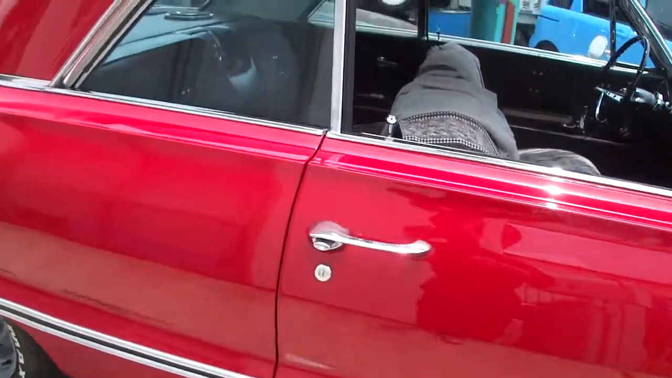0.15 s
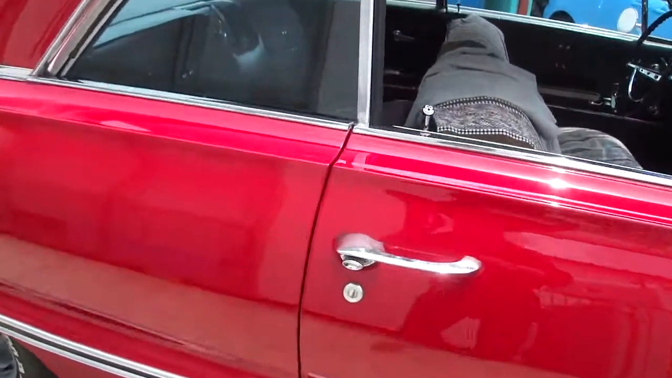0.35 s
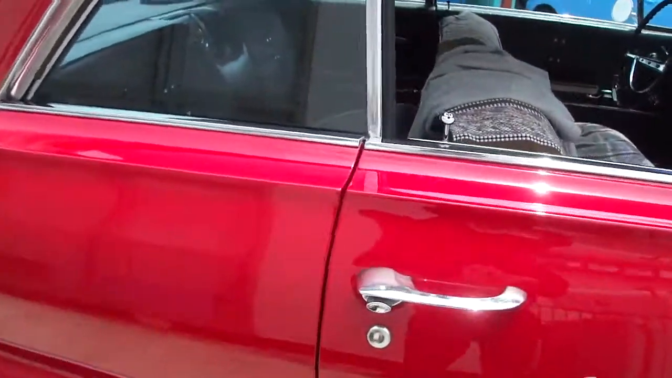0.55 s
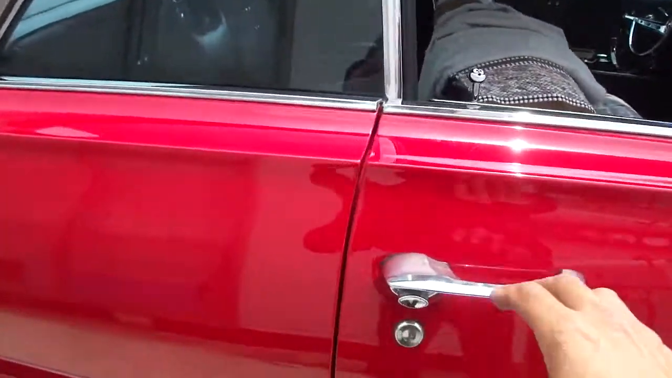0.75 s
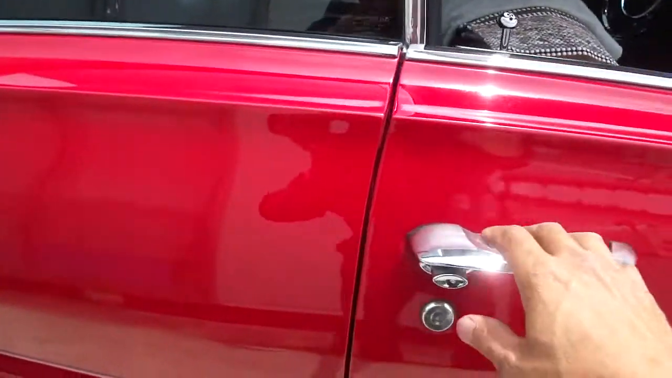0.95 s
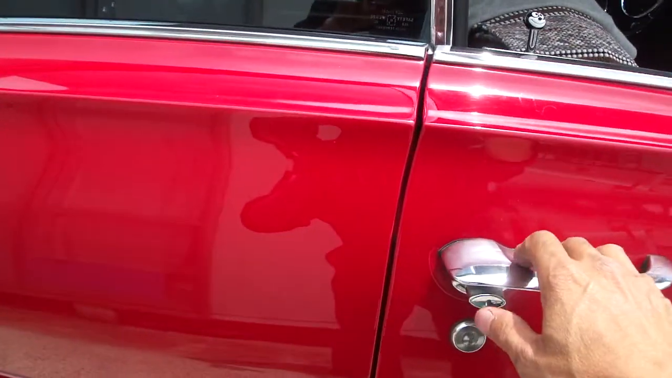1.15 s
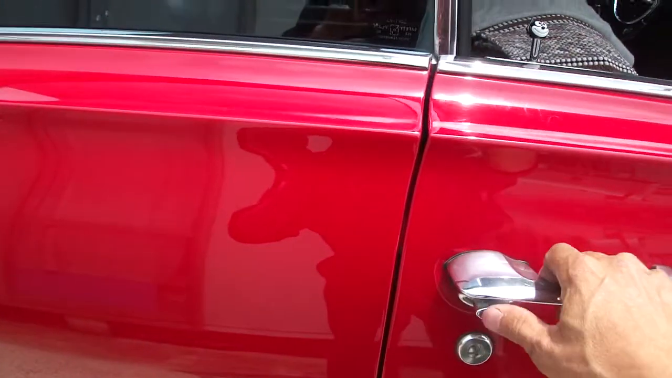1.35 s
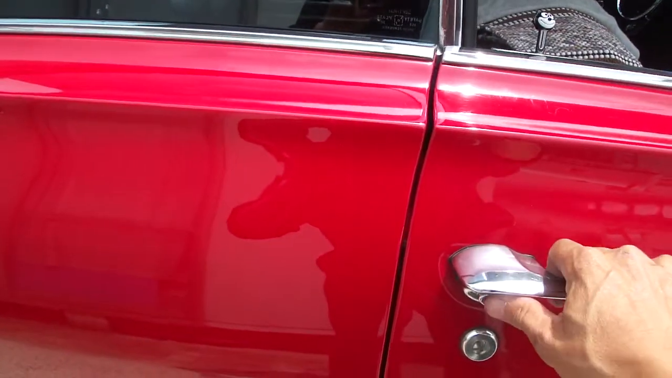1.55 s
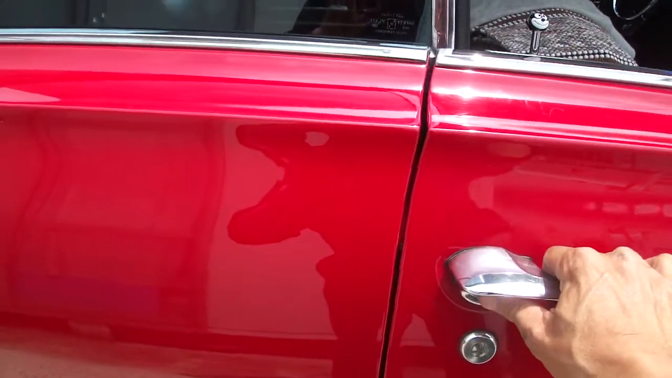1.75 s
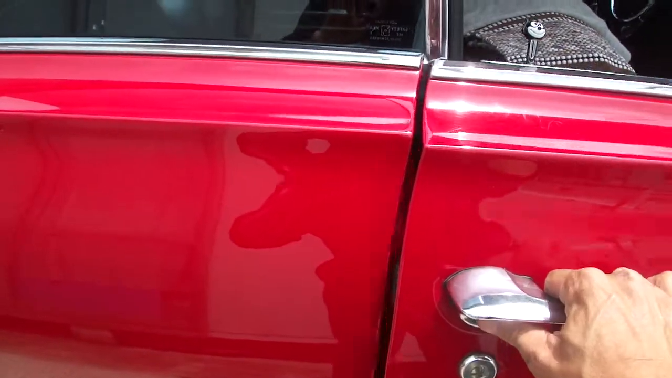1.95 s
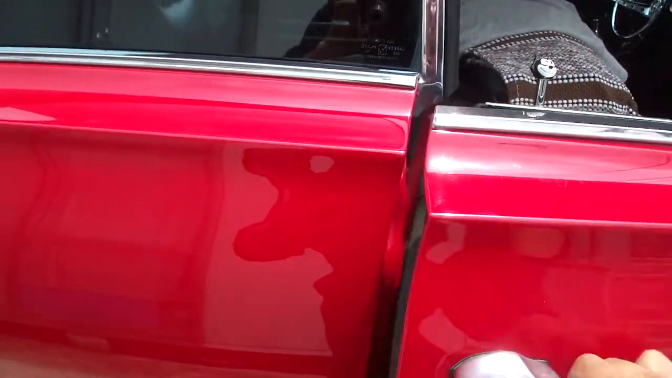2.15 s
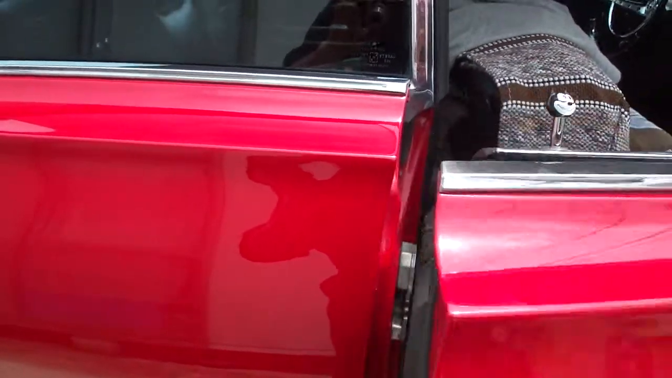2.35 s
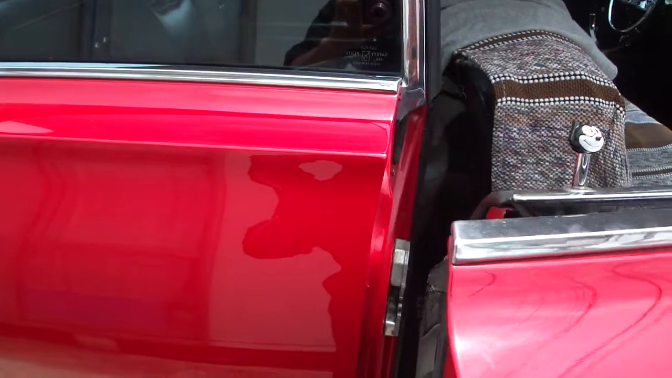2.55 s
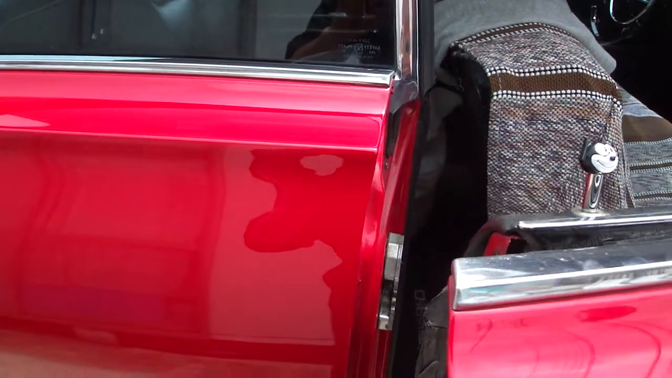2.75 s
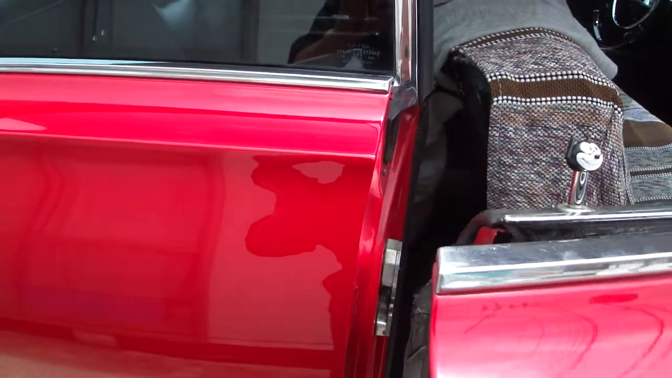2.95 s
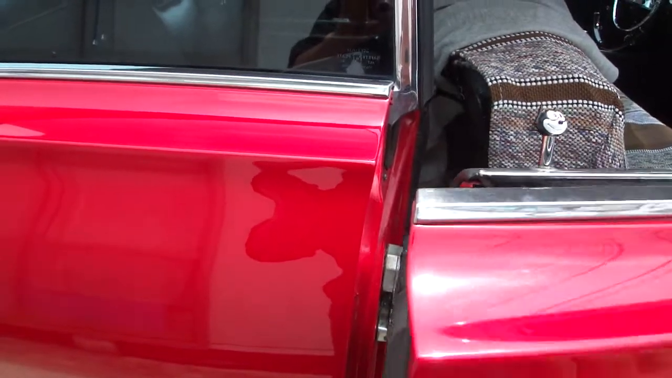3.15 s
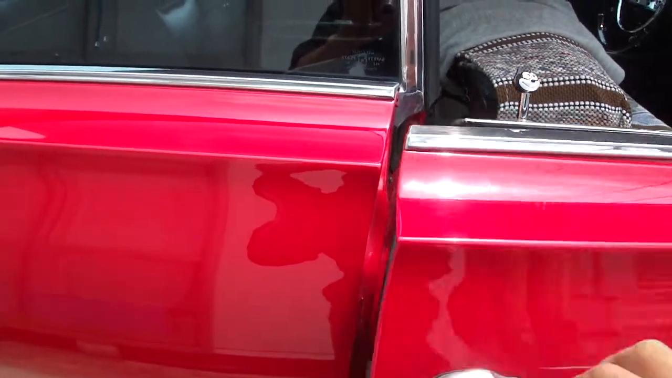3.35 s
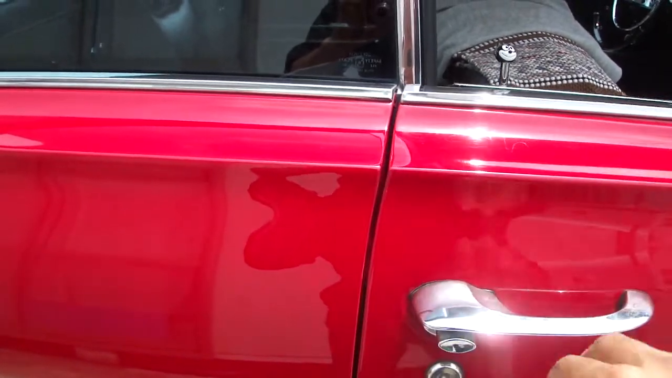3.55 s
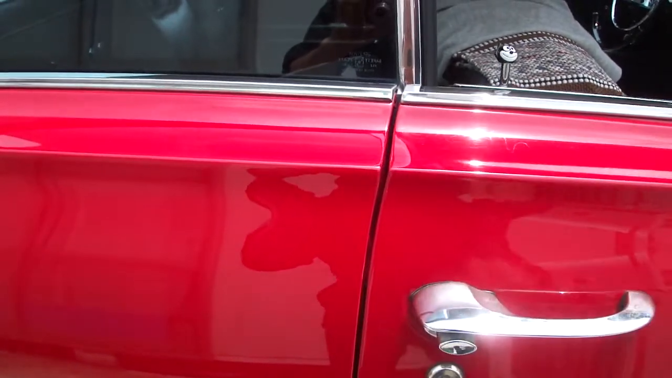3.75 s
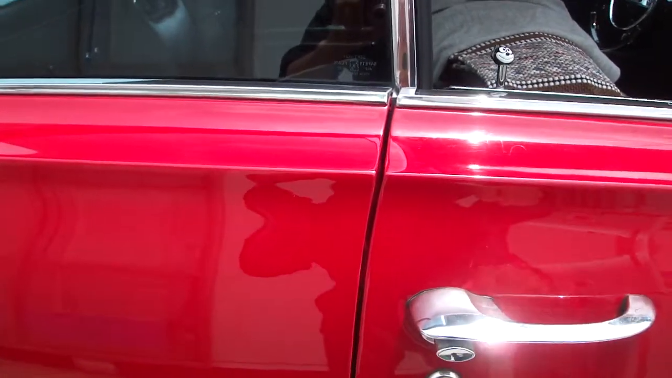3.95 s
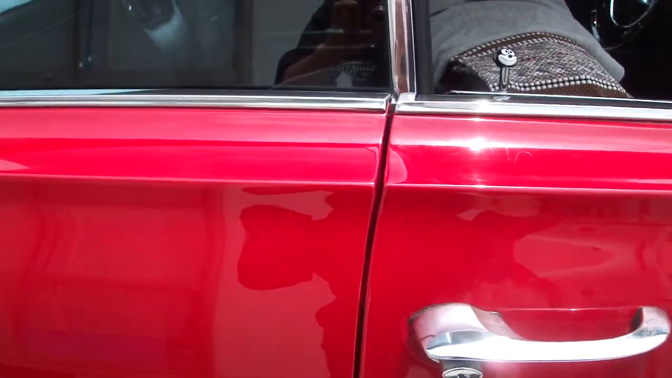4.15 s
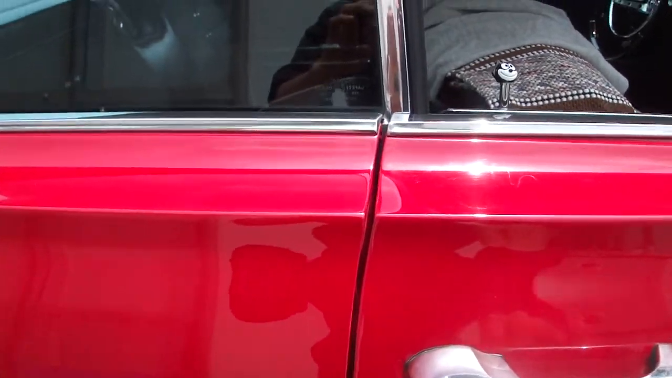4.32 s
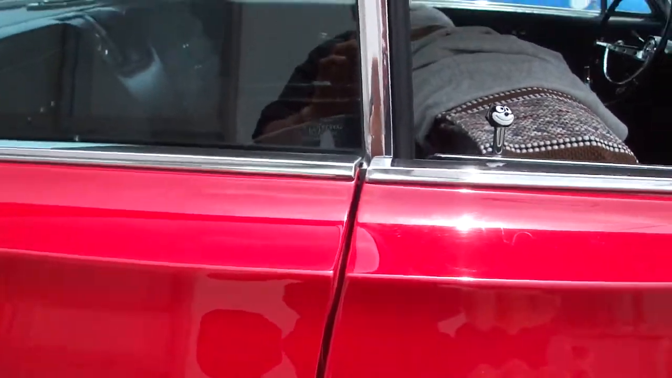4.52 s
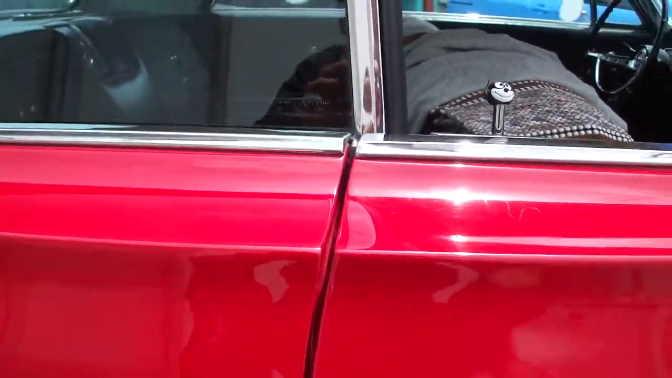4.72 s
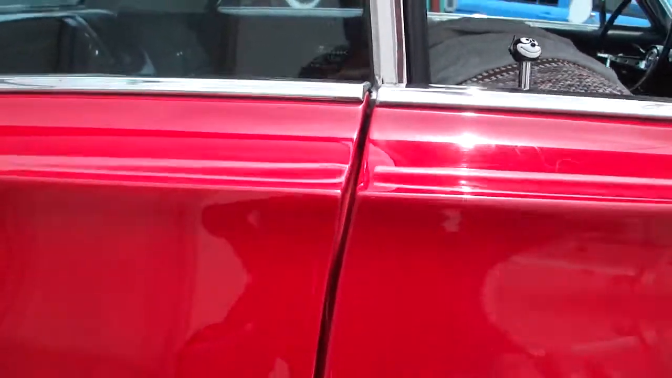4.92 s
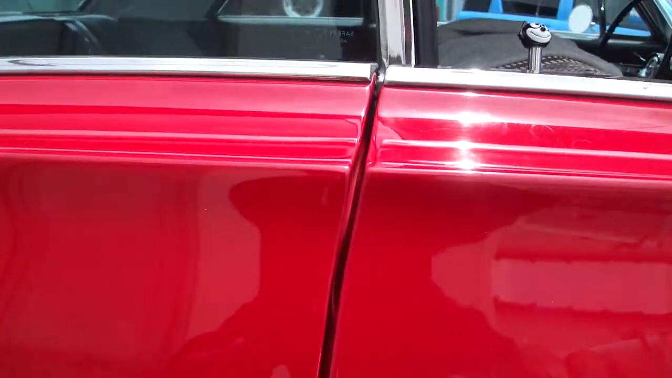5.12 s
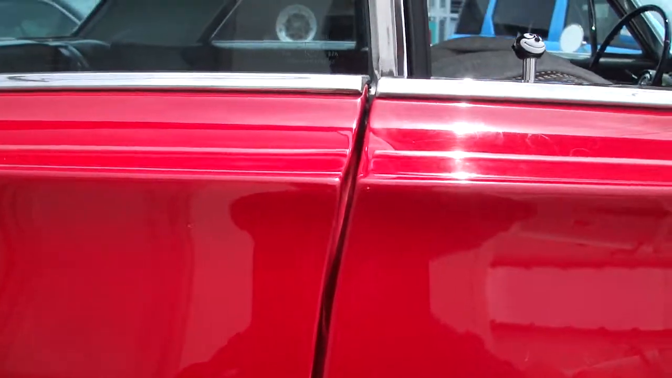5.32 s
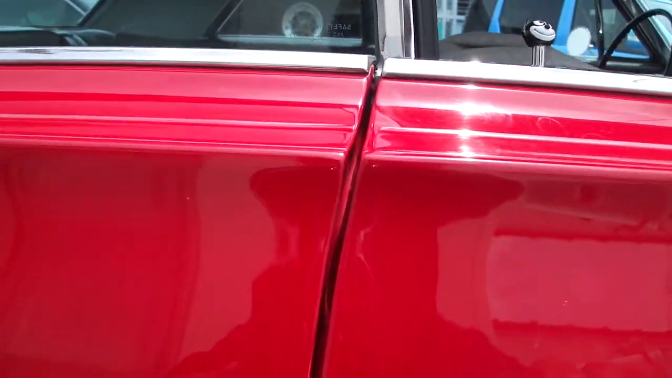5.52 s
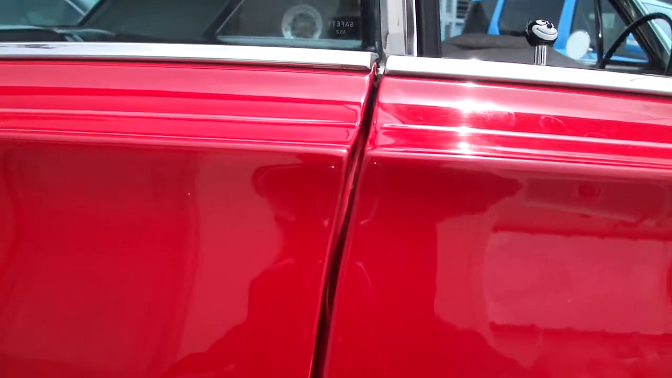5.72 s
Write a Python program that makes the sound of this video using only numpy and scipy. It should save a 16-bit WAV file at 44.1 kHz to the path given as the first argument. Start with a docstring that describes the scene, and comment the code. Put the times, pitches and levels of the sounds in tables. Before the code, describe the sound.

A heavy old car door is unlatched with clicks and a creak, springs open with a clank, then slams shut with a rattling steel thud outdoors.

```python
"""Outdoors in a yard, at the heavy door of an old car, an arm's length from a hand-held camera.
A thumb works the handle button, the latch creaks and springs open; then the door is slammed.
Damped sine knocks, noise rattles and ringing steel modes make the latch, loose parts and thuds into the seal.
The shut steel ticks as it settles. Shaped noise makes a steady drone and a brief scuff; a wavering sine
makes a low hum, and faint filtered clicks make the camera's lens tick at its frame rate."""
import sys
import numpy as np
from scipy import signal
from scipy.fft import rfft, irfft
from scipy.io import wavfile
from scipy.ndimage import uniform_filter1d

SR = 44100
rng = np.random.default_rng(int(sys.argv[2]) if len(sys.argv) > 2 else 0)


def unload_audio(sound):
    """Save the sound as a 16-bit wav file, at the path given as the first command line argument."""
    columns = np.transpose(np.atleast_2d(sound))
    # keep every value between -1 and 1, then stretch to whole-number steps
    steps = np.round(np.clip(columns, -1, 1) * 32767)
    wavfile.write(sys.argv[1], SR, steps.astype(np.int16))


N = 254898
HZ = np.fft.rfftfreq(N, 1 / SR)
TIME = np.arange(N) / SR

# tone colour of rattling steel parts: f/Hz, relative level/dB
STEEL_COLOUR = [(100, -11), (350, -10), (650, 6.5), (1400, 0.5), (1850, -5.5), (2300, -2.5), (3000, -12.5),
                (5200, -18), (6200, -26), (7800, -32), (8600, -43.5), (14000, -56)]
# how the door reaches the two microphone ports: f/Hz, likeness/0-1, right lead/rad, left minus right/dB
DOOR_PORTS = [(103, 0.88, 0.13, 0.5), (700, 0.98, 0.00052, 2), (1350, 0.95, 0.75, -0.5),
              (2300, 0.63, 0.3, -5), (4300, 0.7, 0.7, -6.5), (7740, 0.47, 0.48, -4.5)]


def amp(db):
    """Turns decibels into a gain."""
    return 10 ** (np.asarray(db) / 20)


def evened(x):
    """Scales a signal to an rms of 1."""
    return x / np.sqrt(np.mean(x ** 2) + 1e-20)


def read(points, hz, order=1):
    """Reads one column of a table, joining its points by lines on a log-frequency axis."""
    columns = np.transpose(points)
    return np.interp(np.log(hz + 1), np.log(columns[0] + 1), columns[order])


def add(mix, s, sound):
    """Mixes a sound in, starting at s seconds."""
    part = mix[..., round(s * SR):][..., :sound.shape[-1]]
    part += sound[..., :part.shape[-1]]


def colour(x, spectrum, size=4096):
    """Gives a sound the tone colour of a table; the filter has unit energy and never acts early."""
    log_gain = np.log(amp(read(spectrum, abs(np.fft.fftfreq(size, 1 / SR)))))
    minimum_phase = np.exp(signal.hilbert(log_gain).conj())
    taps = np.fft.ifft(minimum_phase).real[:size // 2]
    taps = taps / np.linalg.norm(taps)
    return signal.oaconvolve(x, taps[None], axes=1)[:, :N]


def related(x, likeness):
    """Blends two unrelated channels so that they become alike, frequency by frequency."""
    a, b = rfft(x, N)
    angle = np.arccos(np.clip(read(likeness, HZ), 0, 1)) / 2
    shared, unlike = a * np.cos(angle), b * np.sin(angle)
    return irfft([shared + unlike, shared - unlike], N)


def ports(x, table):
    """Sets the balance and phase between the two microphone ports, half on each side."""
    balance = np.sqrt(amp(read(table, HZ, order=3)))
    half = balance * np.exp(-.5j * read(table, HZ, order=2))
    return irfft(rfft(x) * [half, 1 / half], N)


def outdoors(patchy_db=2.5, low_hz=250, hiss_hz=1800, size=2048):
    """Shaped noise makes a broad drone with fixed resonances; its lows and hiss drift against its body."""
    # tone colour of the drone: f/Hz, relative level per Hz/dB
    air_colour = [(20, -52), (45, -17), (70, -9.5), (130, 1.5), (230, 1), (320, -3.5), (520, -2), (680, 3),
                  (1480, -1.5), (1780, -8.5), (4800, -16.5), (8000, -32), (9300, -37), (11800, -40),
                  (14000, -61)]
    # resonances in the drone: f/Hz, width/Hz, height/dB
    air_peaks = [(403, 11.8, 11.9), (1415, 346, 14.23), (2468, 147, 10.6), (3920, 360, 7.9),
                 (4775, 150, 9.5)]
    # the resonances flatten as the camera is lifted: t/s, strength
    peak_strength = [(4.4, 1), (5.4, 0.18)]
    # level of the drone's body: t/s, level/dB
    body_level = [(0, -33.5), (1.2, -36.5), (1.9, -36.5), (2.5, -39), (3.15, -38.5), (3.35, -34.5),
                  (4.1, -39.5), (5.05, -41.5), (5.78, -39)]
    # level of its rumble, the band round low_hz: t/s, level/dB
    rumble_level = [(0, -35.5), (.5, -35), (.9, -39), (1.9, -37), (2.6, -40), (4.4, -40), (4.8, -35),
                    (5.78, -39)]
    # how the drone reaches the two microphone ports: f/Hz, likeness/0-1, right lead/rad, left minus right/dB
    air_ports = [(90, 1, 0.5, 2), (456, 0.7, 0.5, 1.5), (810, 0.92, 1.35, -1), (1180, 0.97, 1.52, 3.5),
                 (1635, 0.92, 3, 3), (2136, 0.63, 4, -11), (2510, 0.89, 2, -4), (3040, 0.45, 1.5, -3),
                 (3820, 0.54, 3.5, 1.5), (4560, 0.32, -0.2, 0.5), (7000, 0.25, 1, -2)]
    mean_hiss_db, hiss_follows = -39, 0.41  # the hiss follows only this share of the body's changes

    noise = rng.standard_normal((2, N))
    hz, t, z = signal.stft(noise, SR, nperseg=size, noverlap=size * 3 // 4)
    peaks_db = sum(db / (1 + (2 * (hz - f) / width) ** 2) for f, width, db in air_peaks)
    shape_db = read(air_colour, hz) + peaks_db

    body_db = np.interp(t, *np.transpose(body_level))
    rumble_db = np.interp(t, *np.transpose(rumble_level))
    hiss_db = mean_hiss_db + hiss_follows * (body_db - body_db.mean())
    low = np.exp(-np.log((hz + 1) / low_hz) ** 2)
    high = 1 - 1 / (1 + (hz / hiss_hz) ** 8)

    # small random patches in frequency and time
    patches = uniform_filter1d(rng.standard_normal(z.shape[1:]), size=16, axis=0)
    patches = evened(uniform_filter1d(patches, size=8, axis=1))
    drift_db = body_db + patchy_db * patches
    drift_db = drift_db + np.outer(low, rumble_db - body_db)
    drift_db = drift_db + np.outer(high, hiss_db - body_db)
    drift_db = drift_db + np.outer(peaks_db, np.interp(t, *np.transpose(peak_strength)) - 1)
    z = z * evened(amp(shape_db))[:, None] * amp(drift_db)
    air = signal.istft(z, SR, nperseg=size, noverlap=size * 3 // 4)[1][:, :N]
    return ports(related(air, air_ports), air_ports)


def hum(waver_db=-2.0, wander_hz=3, size=3000):
    """A low sine, as of a distant machine, whose pitch and level waver at random."""
    # course of the hum, before it wavers: t/s, f/Hz, level/dB
    hum_course = [(.35, 238.1, -53), (1.401, 226, -58), (2.5, 224.5, -59.5), (4.6, 231, -77),
                  (5.5, 232.2, -54.5)]
    s, hz, db = np.transpose(hum_course)
    smooth = uniform_filter1d(uniform_filter1d(rng.standard_normal((2, N)), size=size), size=size)
    waver, wander = evened(smooth[0]), evened(smooth[1])
    turns = np.cumsum(np.interp(TIME, s, hz) + wander_hz * wander) / SR
    level = amp(np.interp(TIME, s, db) + waver_db * waver)
    return level * evened(np.sin(2 * np.pi * turns))


def scuff(grain_db=3, clump_db=2.5, size=180):
    """A brief gritty rub: noise whose loudness jumps grain by grain and catches in clumps."""
    # loudness of the rub, silent outside: t/s, level/dB
    scuff_level = [(5.32, -62), (5.338, -44), (5.383, -43), (5.394, -56)]
    # its tone colour: f/Hz, relative level/dB
    scuff_colour = [(300, -30), (950, -18), (1300, 7.5), (1550, -3), (1900, -3), (2700, -16), (3250, -16),
                    (3620, -4.5), (4100, -20), (7000, -15), (13000, -47)]
    clumps = evened(uniform_filter1d(rng.standard_normal(N), size=size))
    grain_gain = amp(grain_db * rng.standard_normal(N) + clump_db * clumps)
    grit = evened(rng.standard_normal((2, N)) * grain_gain)
    level = amp(np.interp(TIME, *np.transpose(scuff_level), left=-np.inf, right=-np.inf))
    return related(colour(grit * level, scuff_colour), DOOR_PORTS)


def lens(fade=0.0017, click_db=12, scatter_db=2, left_db=-2.5, right_db=2):
    """The lens drive steps once a frame with a click and a short chatter; every second step is stronger."""
    # level of the ticks, before the alternation, scatter and balance: t/s, level/dB
    tick_level = [(0, -49.5), (1.3, -52.5), (3.2, -55.5), (4, -50.5), (5.3, -52), (5.52, -44),
                  (5.78, -48.5)]
    # tone colour of a tick: f/Hz, relative level/dB
    tick_colour = [(2000, -31), (4500, 1.5), (5900, 7.5), (6500, 5.5), (7100, 1), (7800, 6.5), (8600, -7.5),
                   (12000, -30)]
    first_s, frame_hz = .0152, 59.94
    uneven_db = 1.3  # even steps this much weaker, odd ones this much stronger
    times = np.arange(first_s, TIME[-1], 1 / frame_hz)
    k = np.arange(len(times))
    step_db = np.interp(times, *np.transpose(tick_level)) - uneven_db * np.cos(np.pi * k)
    step_db = step_db + scatter_db * rng.standard_normal(len(k))
    steps = np.zeros((2, N))
    for at, db in zip(times, step_db):
        add(steps, at, amp(db) * rattle(fade))
        add(steps, at, amp([db + click_db]))  # a single-sample click
    return colour(steps, tick_colour) * amp([[left_db], [right_db]])


def yard(x, wet_db=-16.5, build=0.005, size=256):
    """Scattered echoes from the ground and walls: noise that builds up, then dies at its own speed per band."""
    # time for the echoes to fall by 60 dB: f/Hz, decay/s
    yard_decay = [(100, 1), (250, 0.4), (700, 0.52), (2200, 0.29), (12000, 0.13)]
    hz, t, z = signal.stft(rng.standard_normal((2, SR)), SR, nperseg=size)
    z = z * amp(-60 * t / read(yard_decay, hz)[:, None]) * (1 - np.exp(-t / build))
    tail = signal.istft(z, SR, nperseg=size)[1]
    tail = tail / np.linalg.norm(tail[0])
    wet = signal.fftconvolve(x.mean(0)[None], tail, axes=1)[:, :N]
    return amp(wet_db) * related(wet, DOOR_PORTS)


def knock(hz, swell, order=1):
    """A few cycles of a heavily damped part, peaking after swell seconds."""
    t = TIME[:int(10 * swell * SR)]
    envelope = (t / swell * np.exp(1 - t / swell)) ** order
    return envelope * np.sin(2 * np.pi * hz * t)


def rattle(fade):
    """A swarm of tiny contacts dying over fade seconds, in two unrelated channels."""
    t = TIME[:SR // 2]
    return rng.choice([-1, 1], (2, len(t))) * np.exp(-t / fade)


def ringing(modes):
    """Modes (f/Hz, level/dB, 60 dB decay/s) struck with chance phases, in two unrelated channels."""
    t = TIME[:SR // 4]
    return sum(amp(db - 60 * t / t60) * np.sin(2 * np.pi * (hz * t + rng.random((2, 1))))
               for hz, db, t60 in modes)


def shell(blows):
    """The sheet steel of the door rings in its own modes after each blow."""
    # modes of the sheet steel: f/Hz, relative level/dB, 60 dB decay/s
    shell_modes = [(221, -3, .56), (339, 2, .22), (463, 0, .42), (592, 0, .36), (682, 2, .24),
                   (743, -1.5, .24), (784, -1, .2), (815, 1, .24), (904, 2, .22), (938, 2, .22),
                   (1020, -2, .2), (1168, 0, .24), (1363, 0, .22), (1497, 1, .18), (2122, -6, .26),
                   (2244, -2, .2), (2326, -5, .16), (2536, -10, .13)]
    shell_db = -45
    t = TIME[:SR]
    modes = sum(amp(db - 60 * t / t60) * np.sin(2 * np.pi * hz * t) for hz, db, t60 in shell_modes)
    return amp(shell_db) * signal.oaconvolve(blows, modes[None], axes=1)[:, :N]


def steel(shaken, treble, treble_hz=2800):
    """Rattles take the colour of steel; harder contact is given more treble."""
    dull = signal.lfilter(*signal.butter(1, treble_hz, fs=SR), shaken)
    return colour(dull + treble * (shaken - dull), STEEL_COLOUR)


def radiated(x, corner_hz):
    """A part that is small against the wavelength gives off little bass."""
    return signal.sosfilt(signal.butter(2, corner_hz, "highpass", fs=SR, output="sos"), x)


def settling(cycles=4.04, snap_fade=0.0068, squeak_db=-39, squeak_hz=1318):
    """The shut door ticks: a dry snap, a few cycles of steel and a thin squeak until about the next tick."""
    # ticks of the settling steel: t/s, knock level/dB, knock f/Hz, snap level/dB
    settle_ticks = [(4.641, -19.5, 1328, -31), (4.6838, -38, 2240, -41)]
    knocks, snaps = np.zeros(N), np.zeros((2, N))
    first_s = settle_ticks[0][0]
    t = np.arange(0, settle_ticks[1][0] - first_s, 1 / SR)
    slip = np.sin(np.pi * np.arange(len(t)) / len(t)) ** (1 / 4)
    squeak = amp(squeak_db) * slip * np.sin(2 * np.pi * squeak_hz * t)
    add(knocks, first_s + cycles / squeak_hz, squeak)
    for s, db, hz, snap_db in settle_ticks:
        add(knocks, s, amp(db) * knock(hz, cycles / hz, order=3))
        add(snaps, s, amp(snap_db) * rattle(snap_fade))
    return knocks + related(colour(snaps, STEEL_COLOUR), DOOR_PORTS)


def linkage(fade=0.017, dull_hz=3300, creak_swell=0.0028, creak_rattle_db=-17):
    """Each clunk or creaking slip knocks and shakes the loose parts inside the closed door."""
    # clunks of the button and its rod: t/s, knock level/dB, knock f/Hz, swell/s, rattle level/dB
    clunks = [(1.4972, -28, 780, 0.0016, -30), (1.5345, -22, 940, 0.0009, -34),
              (1.5395, -23, 750, 0.0032, -33), (1.5435, -26, 1020, .0015, -36),
              (1.719, -30, 902, 0.0055, -35), (1.739, -35, 485, 0.0061, -39),
              (1.8895, -30, 1000, 0.0089, -36), (1.9163, -17, 1220, 0.0016, -27),
              (1.9221, -12.5, 1080, .0018, -24)]
    # slips of the latch creaking under load, near one pitch: t/s, level/dB, f/Hz
    creaks = [(1.973, -25, 1250), (1.9987, -15, 1155), (2.0186, -23, 1180), (2.0322, -15, 1140),
              (2.045, -20.5, 1160)]
    rebound_s, rebound_db = 0.0083, -7.5  # each slip rebounds once
    knocks, shaken = np.zeros(N), np.zeros((2, N))
    for s, db, hz, swell, loose_db in clunks:
        add(knocks, s, amp(db) * knock(hz, swell))
        add(shaken, s, amp(loose_db) * rattle(fade))
    for s, db, hz in creaks:
        slip = amp(db) * knock(hz, creak_swell, order=3)
        add(knocks, s, slip)
        add(knocks, s + rebound_s, amp(rebound_db) * slip)
        add(shaken, s, amp(db + creak_rattle_db) * rattle(fade))
    muffled = signal.lfilter(*signal.butter(2, dull_hz, fs=SR), shaken)
    return knocks + related(colour(muffled, STEEL_COLOUR), DOOR_PORTS)


def catch(ring_db=-21, t60=0.1, swell=.001):
    """Freed from the striker as the door springs open, the catch flies against its stop and rings."""
    # modes of the latch's catch: f/Hz, relative level/dB
    catch_modes = [(1026, -4), (1110, -5), (1392, -5), (1495, 0), (1646, -2), (2020, -7), (3149, -15),
                   (3542, -14)]
    release_s = 2.141
    out = np.zeros((2, N))
    rise = (1 - np.exp(-TIME[:SR // 4] / swell)) ** 2
    ring = ringing([(hz, db, t60) for hz, db in catch_modes])[0]  # the same in both channels
    add(out, release_s, amp(ring_db) * rise * ring)
    return out


def loose_parts(contact=0.005, hard_db=10.5, soft_db=-1):
    """Rods, springs and window gear chatter at random while the door shakes, duller as they die down."""
    # shaking as the door springs open, meets the striker and lands in its seal:
    # t/s, hold/s, fade/s, chatter level/dB, shell blow level/dB
    shakes = [(2.132, 0.016, 0.017, -24, -45), (3.52, 0.07, 0.06, -28.5, -38),
              (3.605, 0.025, 0.045, -36, -31)]
    contacts_per_s, contact_spread_db = 260, 2.5
    sizes = amp(contact_spread_db * rng.standard_normal(N)) * (rng.random(N) < contacts_per_s / SR)
    # every contact is a burst of noise that fades over contact seconds
    power = signal.lfilter([1], [1, -np.exp(-2 / (contact * SR))], sizes ** 2)
    chatter = evened(np.sqrt(power) * rng.standard_normal((2, N)))
    blows, shaken, force = np.zeros((2, N)), np.zeros((2, N)), np.zeros(N)
    for s, hold, fade, db, shell_db in shakes:
        shake = (TIME >= s) * np.exp(-np.maximum(TIME - s - hold, 0) / fade)
        force = np.maximum(force, shake)
        shaken += amp(db) * shake * chatter
        blows += amp(shell_db) * shake * chatter
    treble = amp(soft_db + (hard_db - soft_db) * force)
    return related(shell(blows) + steel(shaken, treble), DOOR_PORTS)


def pawl(swell=0.0015, ring_db=-16, buzz_db=-9, buzz_fade=0.0036, treble_db=6):
    """The latch's spring-loaded pawl clanks and bounces, each time with a buzz and a short bright ring."""
    # clanks of the pawl: t/s, level/dB, f/Hz
    clanks = [(2.1277, -23, 4970), (2.1415, -17, 2050), (3.5497, -24, 2300), (3.5708, -7.5, 2230),
              (3.5971, -15.5, 2250), (3.609, -20.5, 2240), (3.6462, -20.5, 2200), (3.653, -21.5, 2290),
              (3.6974, -29, 2230), (3.7205, -30, 2090), (3.7458, -36, 2190), (3.77, -36, 2150)]
    # modes of the pawl: f/Hz, relative level/dB, 60 dB decay/s
    pawl_modes = [(2122, 1, .13), (2245, 4, .13), (2326, 0, .12), (2500, -5, .11), (3020, -7, .04)]
    out, shaken = np.zeros((2, N)), np.zeros((2, N))
    rise = 1 - np.exp(-TIME[:SR // 4] / swell)
    for s, db, hz in clanks:
        add(out, s, amp(db) * knock(hz, swell))
        add(out, s, amp(db + ring_db) * rise * ringing(pawl_modes))
        add(shaken, s, amp(db + buzz_db) * rattle(buzz_fade))
    return out + related(steel(shaken, amp(treble_db)), DOOR_PORTS)


def panel(boom_db=-12, fade=0.024, ring_db=25, seal_hz=900):
    """The panel flexes on its rubber seal: each low thud booms in the hollow door and rings its lower modes."""
    # thuds of the whole panel: t/s, level/dB, f/Hz
    thud_events = [(1.544, -27.5, 430), (1.717, -30.5, 177), (1.741, -32, 324), (2.152, -29, 333),
                   (2.173, -30, 225), (2.196, -33.5, 199), (2.221, -30, 242), (2.249, -39, 236),
                   (3.549, -28.5, 163), (3.595, -24, 106), (3.606, -14, 238), (3.614, -12.5, 342),
                   (3.629, -15.5, 215), (3.644, -20.5, 151), (3.651, -25.5, 396), (3.687, -22, 230),
                   (3.712, -30.5, 147), (3.733, -30.5, 252), (3.757, -29.5, 160), (3.79, -32.5, 210)]
    # tone colour of the hollow door: f/Hz, relative level/dB
    cavity_colour = [(25, -42), (55, -24), (100, -16), (220, 9.5), (400, 12.5), (700, -27), (1500, -8),
                     (6000, -72)]
    thud_cycles = 1.2  # a thud peaks after this many cycles
    thuds, boom, blows = np.zeros(N), np.zeros((2, N)), np.zeros((1, N))
    for s, db, hz in thud_events:
        add(thuds, s, amp(db) * knock(hz, thud_cycles / hz, order=2))
        add(boom, s, amp(db + boom_db) * rattle(fade))
        add(blows, s, amp([db + ring_db]))
    # the soft seal takes the treble off the blows
    cushioned = signal.lfilter(*signal.butter(2, seal_hz, fs=SR), blows)
    return thuds + shell(cushioned) + related(colour(boom, cavity_colour), DOOR_PORTS)


def latch(fade=0.0081, contact=0.00022, treble_db=4):
    """Steel on steel: every strike knocks, rattles the lock and rings the door shell."""
    # latch hitting the striker, on opening and on slamming:
    # t/s, knock level/dB, knock f/Hz, swell/s, shell blow level/dB, rattle level/dB
    strikes = [(2.1276, -9, 860, 0.00085, -10, -20.5), (2.1335, -8, 1230, 0.00054, -25, -20),
               (2.1418, -14.5, 1620, 0.00027, -14, -16), (2.1468, -12.5, 1487, 0.0022, -14, -23.5),
               (2.1535, -22, 1070, 0.0017, -20, -16), (2.1612, -22, 1174, .0022, -8, -22.5),
               (3.5209, -7.5, 804, 0.00073, -1, -14.5), (3.5315, -16, 1170, 0.0012, -16, -12),
               (3.538, -10, 1200, 0.002, -1.5, -20), (3.5461, -6.5, 960, 0.0008, 1, -15),
               (3.5503, -10, 1330, 0.0004, -9, -11), (3.568, -13, 1220, 0.00038, -15, -10),
               (3.5715, -12.5, 780, 0.0015, 7, -17), (3.5722, -12.5, 1410, 0.0024, -10, -20),
               (3.6178, -9.5, 863, 0.0011, -8, -41), (3.6257, -7.5, 815, 0.00072, -24, -26),
               (3.638, -10, 610, 0.001, -23, -46), (3.656, -9.5, 755, 0.00045, -2, -20),
               (3.698, -23.5, 524, 0.0025, -23, -34), (3.7135, -31, 940, 0.001, -26, -28),
               (3.747, -27, 684, 0.0035, -23, -42)]
    knocks, blows, shaken = np.zeros(N), np.zeros((2, N)), np.zeros((2, N))
    for s, db, hz, swell, ring_db, rattle_db in strikes:
        add(knocks, s, amp(db) * knock(hz, swell))
        add(blows, s, amp(ring_db) * rattle(contact))  # each rough contact favours other modes
        add(shaken, s, amp(rattle_db) * rattle(fade))
    return knocks + related(shell(blows) + steel(shaken, amp(treble_db)), DOOR_PORTS)


def scene():
    """The door in its yard, over the drone, hum, scuff and lens ticks."""
    background = outdoors() + hum() + scuff() + lens()
    small_parts = settling() + linkage() + catch() + loose_parts() + pawl() + latch()
    door = radiated(small_parts, corner_hz=195) + radiated(panel(), corner_hz=75.6)
    return background + ports(door + yard(door), DOOR_PORTS)


def record(dry):
    """Rounds off the loudest peaks, then removes the highest treble."""
    ceiling, edge_hz = .95, 14100
    held = dry / (1 + (dry / ceiling) ** 8) ** (1 / 8)
    lowpass = signal.firwin(511, edge_hz, window=("kaiser", 9), fs=SR)
    return signal.oaconvolve(held, lowpass[None], "same")


dry = scene()
out = record(dry)
unload_audio(out)
```